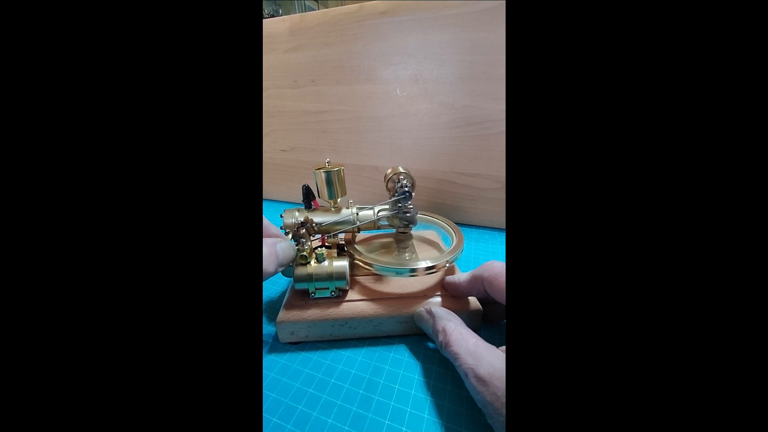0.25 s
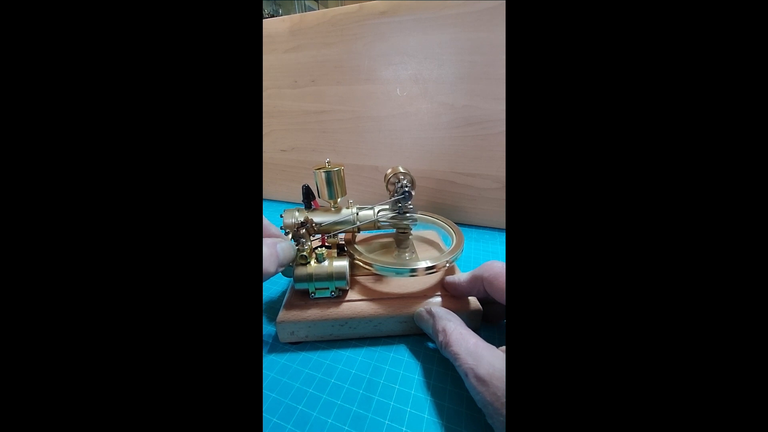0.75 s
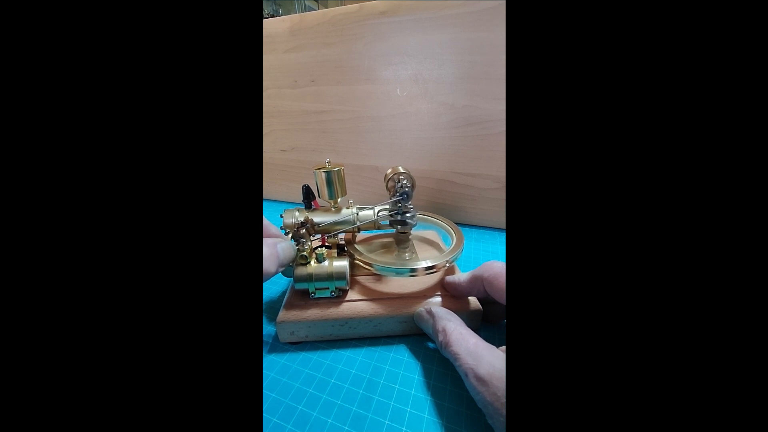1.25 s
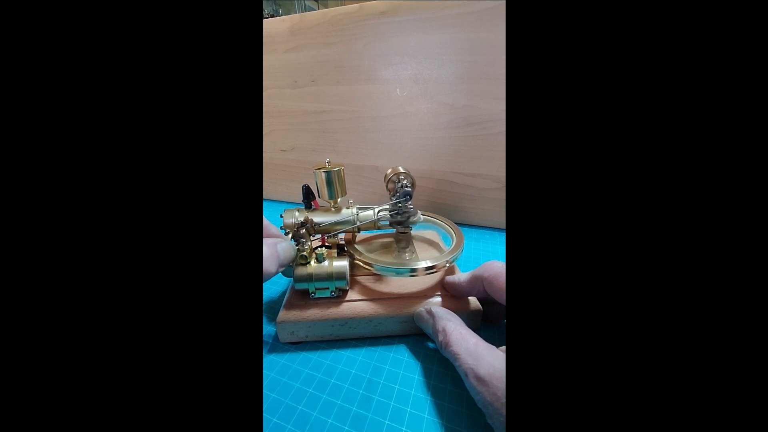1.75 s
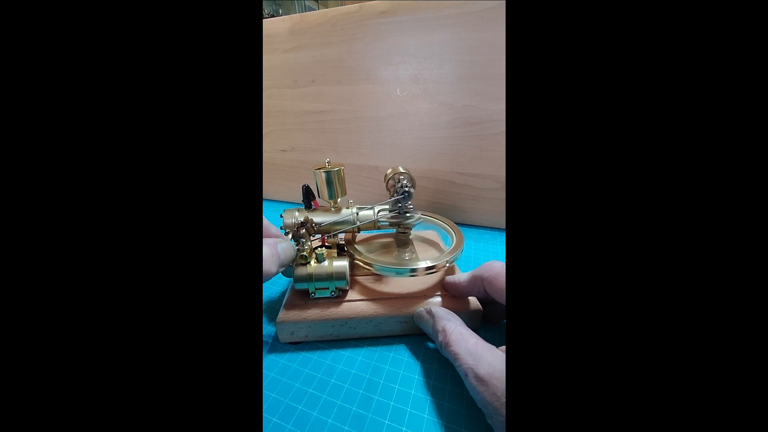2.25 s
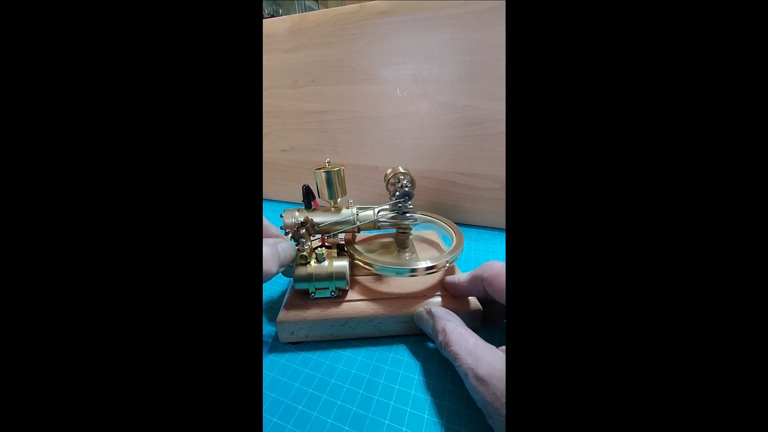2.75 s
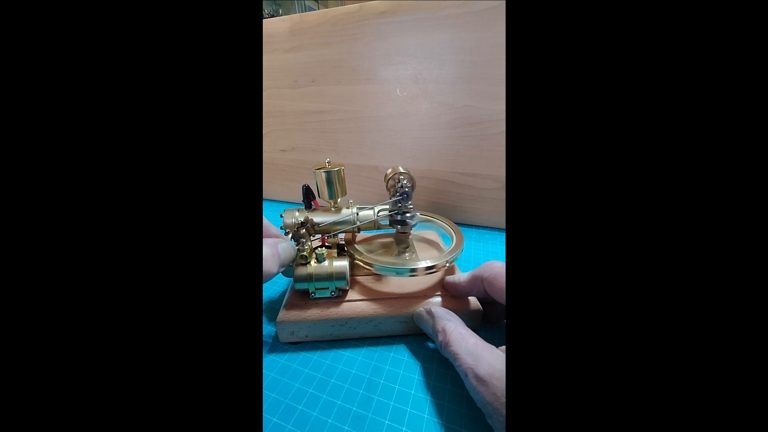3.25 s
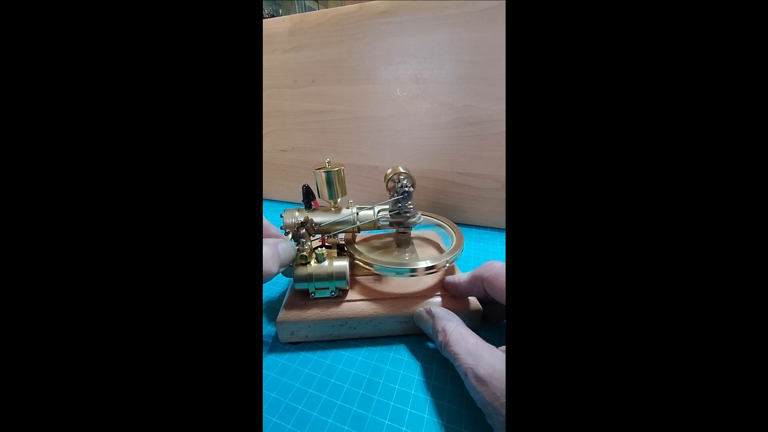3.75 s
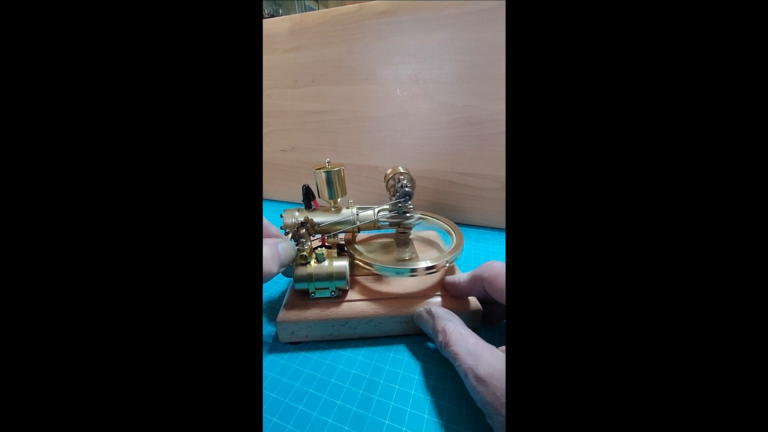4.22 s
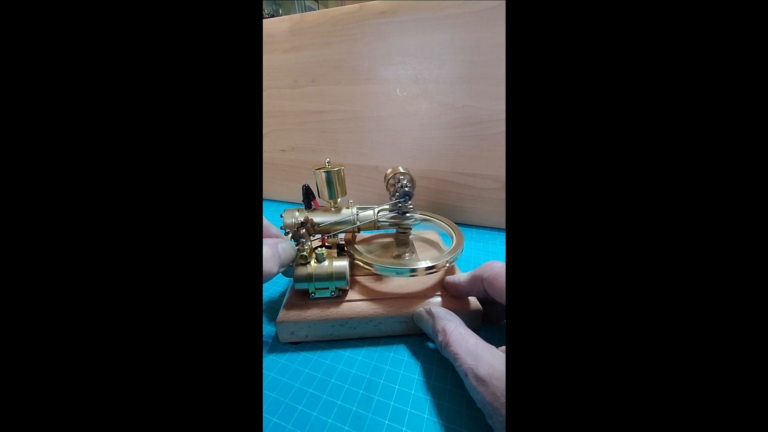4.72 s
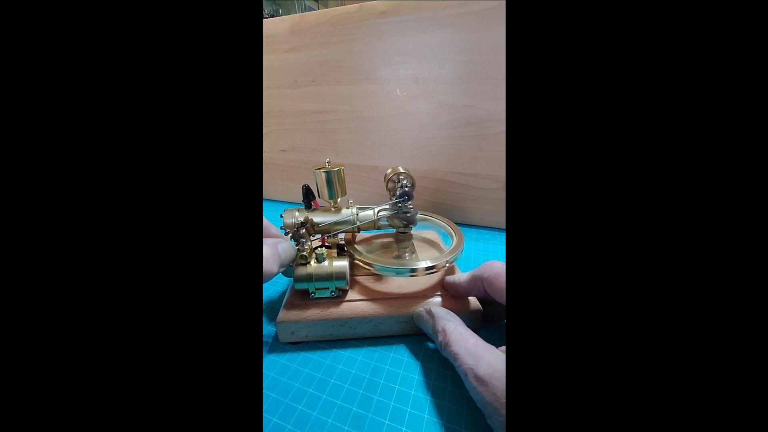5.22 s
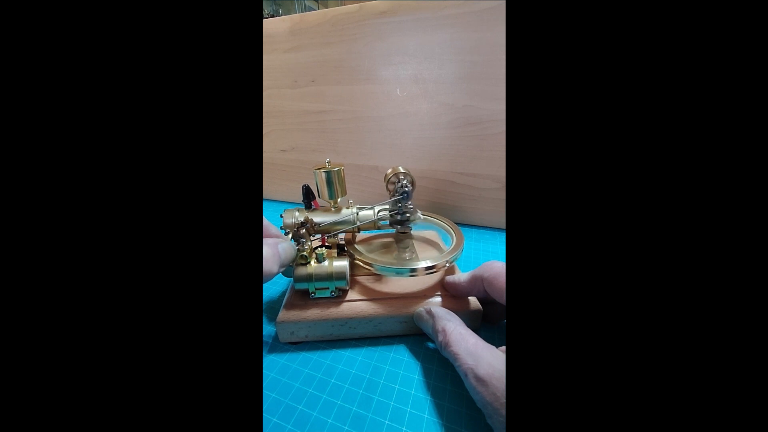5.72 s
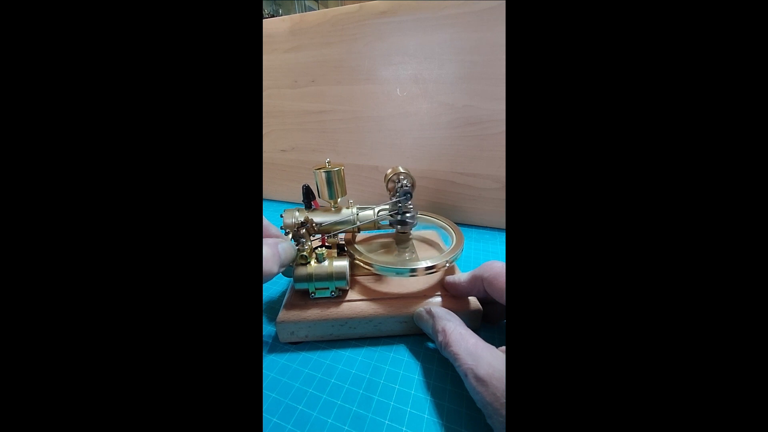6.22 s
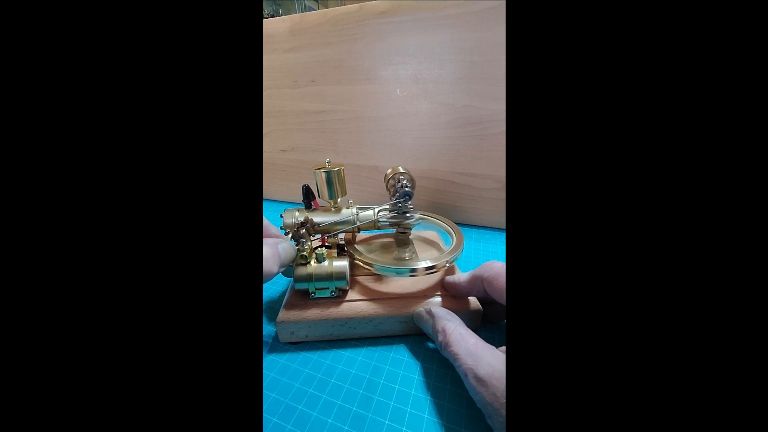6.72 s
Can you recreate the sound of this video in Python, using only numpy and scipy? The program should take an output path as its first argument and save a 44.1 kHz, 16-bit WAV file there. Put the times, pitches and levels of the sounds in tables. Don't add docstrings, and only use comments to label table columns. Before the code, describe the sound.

A small brass hit-and-miss engine pops sharply about three or four times a second, with clacking linkage and short air hisses between, heard close up.

```python
import sys
import numpy as np
from scipy import signal
from scipy.fft import rfft, irfft, next_fast_len
from scipy.io import wavfile
from scipy.ndimage import uniform_filter1d

SR = 44100
rng = np.random.default_rng(int(sys.argv[2]) if len(sys.argv) > 2 else 0)


def unload_wav(signal):
    wavfile.write(
        sys.argv[1],
        SR,
        np.round(np.clip(np.atleast_2d(signal).T, -1, 1) * 32767).astype(np.int16),
    )


def rack_gain(trim_db):
    fader = np.asarray(trim_db, float)
    return 10 ** (fader / 20)


N = 307377

# valve opening in seconds, pop in dB, ring of the top pipe mode in dB,
# flywheel ring in dB, cam clack in dB.
FIRINGS = [(0.0428, -3.5, 1, -54.5, -29.5), (0.3435, -2, 1, -36.5, -27.5), (0.6474, -0.7, -1, -31.5, -28),
           (0.9544, 1.2, -4.5, -44.5, -26.5), (1.2713, -0.9, 0, -46, -29), (1.4811, 1.5, -6.5, -39, -32),
           (1.8086, -1.3, 0.5, -38.5, -31), (2.023, 0.1, -3.5, -37, -33), (2.3545, 0, -2.5, -55, -27),
           (2.5721, 0.5, -4.5, -38, -28), (2.795, 0.6, -6, -40, -30), (3.0192, 1.5, -7, -32, -30.5),
           (3.3729, 0.5, -4.5, -43, -35), (3.6081, 1.9, -13.5, -26.5, -34), (4.1306, -3.5, -3, -52, -41),
           (4.3833, 0.3, -5.5, -40, -46), (4.6331, 0.7, -8.5, -42, -37), (5.0118, -3, -5.5, -60, -44),
           (5.2502, -1.7, -0.5, -58, -37), (5.6042, -3, 0, -66, -38), (5.8305, 0.5, -2, -37, -31),
           (6.177, -1, 0.5, -39, -30), (6.6461, -1.4, -0.5, -43, -34.5)]
LAST_S = 7.002


def read(points, hz):
    f, value = np.transpose(points)
    return np.interp(np.log(hz + 1), np.log(f + 1), value)


def evened(x):
    return x / np.sqrt(np.mean(x ** 2) + 1e-20)


def hiss_noise():
    return rng.standard_normal(N)


def coloured(x, spectrum):
    size = next_fast_len(len(x))
    gain = rack_gain(read(spectrum, np.fft.rfftfreq(size, 1 / SR)))
    return evened(irfft(rfft(x, size) * gain, size)[:len(x)])


def resonance(x, hz, width_hz):
    b, a = signal.iirpeak(hz, hz / width_hz, SR)
    return evened(signal.lfilter(b, a, x))


def bump(x, centre, width):
    return np.exp(-.5 * ((x - centre) / width) ** 2)


def ring(modes, size=8192):
    t = np.arange(size) / SR
    return sum(rack_gain(db - 60 * t / t60) * np.sin(2 * np.pi * hz * t) for hz, db, t60 in modes)


def strikes(s, gain, sound):
    train = np.zeros(N + SR)
    np.add.at(train, np.round(np.clip(s, 0, None) * SR).astype(int), gain)
    return signal.oaconvolve(train[:N], sound)[:N]


def knocks(s, gain, modes, contact_s):
    t = np.arange(512) / SR
    push = t * np.exp(-t / contact_s) / (contact_s ** 1.53 * np.sqrt(SR / 4))
    contact = strikes(s, gain, push)
    return signal.oaconvolve(contact * hiss_noise(), ring(modes))[:N]


def cycles():
    cycle_s = .118
    slowing = 2.7
    gulp_early_s = .0016
    s = np.r_[np.transpose(FIRINGS)[0], LAST_S]
    gap_s = np.diff(s)
    count = np.round(gap_s / cycle_s).astype(int)
    row = np.repeat(np.arange(len(gap_s)), count)
    since = np.arange(len(row)) - (np.cumsum(count) - count)[row]
    speed = (count / gap_s + slowing * gap_s / 2)[row]
    coast_s = (speed - np.sqrt(speed ** 2 - 2 * slowing * since)) / slowing
    return s[row] + coast_s - gulp_early_s * (since > 0), row, since


def crank():
    s = cycles()[0]
    edges = np.r_[2 * s[0] - s[1], s, LAST_S]
    turn = np.interp(np.arange(N) / SR, edges, np.arange(len(edges)))
    return edges[:-1], np.diff(edges), turn % 1, turn


def exhaust():
    # mode in Hz, sign, level in dB, t60 in seconds.
    pipe = [(186.7, -1, -3.5, 0.02), (354.7, 1, -14.5, 0.035), (313, -1, -13, 0.023),
            (1350, 1, -11.5, 0.0073), (999, 1, -3, 0.028), (1196, 1, 4, 0.019)]
    # delay in seconds, sign, level in dB, width in seconds.
    blow = [
        (.00033, 1, -1, 0.00018),
        (.0029, 1, -11, 0.00016),
    ]
    gulp = [
        (.0009, -1, -21.5, 0.00017),
        (.00303, 1, -27, 0.000091),
    ]
    # frequency in Hz, density in dB per Hz.
    crack = [(1060, -9), (1800, -9), (2400, -3.5), (3900, -14.5), (5000, -9), (6910, -21), (9410, 5),
             (10500, -2.5), (11600, -2), (13800, -11), (15300, -2), (16200, -17), (16800, -43)]
    lead_s = .001
    s, row, since = cycles()
    length_s = crank()[1][1:]
    t = np.arange(4096) / SR
    fired = 1. * (since == 0)
    blow_db, ring_db = np.array(FIRINGS)[row, 1:3].T
    gulp_db = 1 + 55 * (length_s - .108) - (since - 1)
    pop_db = np.where(fired, blow_db, gulp_db)

    modes = [sign * ring([(hz, db, t60)], size=4096) for hz, sign, db, t60 in pipe]
    low, high = sum(modes[:5]), sum(modes[5:])
    pop = np.zeros(N)
    for share, steps in ((fired, blow), (1 - fired, gulp)):
        bells = 0
        for delay_s, sign, db, width_s in steps:
            area = width_s * SR * np.sqrt(2 * np.pi)
            bells = bells + sign * rack_gain(db) * bump(t[:400], lead_s + delay_s, width_s) / area
        pop += strikes(s - lead_s, share * rack_gain(pop_db), np.convolve(bells, low))
        pop += strikes(s - lead_s, share * rack_gain(pop_db + fired * ring_db), np.convolve(bells, high))

    decay = rack_gain(-7.5 - 60 * t / 0.014) + rack_gain(-38 - 60 * t / 0.26)
    burst = (1 - np.exp(-t / 0.0015)) ** 2 * decay
    strength = rack_gain(0.4 * pop_db) * (fired + rack_gain(-29) * (1 - fired))
    jet = strikes(s - .0008, strength, burst) * coloured(hiss_noise(), crack)
    return pop, jet


def linkage():
    # mode in Hz, level in dB, t60 in seconds.
    cam = [(303, -10, 0.04), (800, -5, 0.015), (2126, 0, 0.018), (2260, -9, 0.012)]
    wheel = [(5500, -8, 0.03), (5566, -0.5, 0.017), (5600, 5, .04)]
    stem = [(12600, 4.5, .005), (7900, -3.5, 0.0063), (14900, -13, .005)]
    seat = [(3170, 1.5, 0.02), (3600, -2.5, 0.016), (2450, -2, 0.0071), (4770, -19, 0.014)]
    rocker = [(9700, -1.5, 0.008), (9380, -9, 0.0059), (11400, -19, 0.011), (14100, -31, 0.0034),
              (4370, -38, 0.012), (7500, -19.5, 0.064)]
    pushrod = [(7237, -0.5, 0.05), (7360, -5.5, 0.016), (3885, -5.5, 0.033), (5460, -9, 0.046),
               (9300, -4, .01)]
    # part, share of the cycle, share earlier after a firing, level in dB.
    ticks = [
        ("stem", 0, 0.012, -37),
        ("seat", 0.0255, 0, -36.5),
        ("rocker", .233, .011, -20),
        ("pushrod", 0.19, 0.0452, -42.5),
        ("pushrod", 0.47, 0.006, -43),
        ("pushrod", .478, 0.0122, -37.5),
        ("rocker", .589, 0.0061, -34),
    ]
    parts = dict(stem=stem, seat=seat, rocker=rocker, pushrod=pushrod)
    cam_scatter_db, rattle_t60_s, rattle_db = 1.5, .22, 1.5
    seat_slack_s, seat_soft_db = .112, -9.5
    starts_s, lengths_s = crank()[:2]
    s, length_s = starts_s[1:], lengths_s[1:]
    _, row, since = cycles()
    fired = 1. * (since == 0)
    wheel_db, clack_db = np.array(FIRINGS)[row, 3:5].T

    cam_db = clack_db + (1 - fired) * cam_scatter_db * rng.uniform(-1, 1, len(s))
    out = knocks(s + (.225 - 0.0197 * fired) * length_s, rack_gain(cam_db + 0.5), cam, contact_s=0.0014)

    fade = rack_gain(-60 * np.arange(8192) / SR / rattle_t60_s)
    chatter = strikes(s, rack_gain(wheel_db + rattle_db) * fired, fade / np.linalg.norm(fade))
    out += signal.oaconvolve(chatter * hiss_noise(), ring(wheel))[:N]

    slack = dict(seat=rack_gain(seat_soft_db * (length_s < seat_slack_s)))
    for part, share, early, db in ticks:
        late, force = rng.uniform(-0.9, 1, (2, len(s)))
        at_s = s + (share - early * fired + 0.0046 * late) * length_s
        out += knocks(at_s, rack_gain(db) * slack.get(part, 1) * 1.37 ** force, parts[part], contact_s=0.0004)
    return out


def valve_hiss():
    # frequency in Hz, density in dB per Hz.
    air = [(290, -27), (500, -14), (701, -20), (1170, -8), (1750, -18.5), (3240, -13.5), (4810, -18.5),
           (5490, -13.5), (6460, -14.5), (7940, -5), (10500, -11.5), (11300, -1.5), (12900, -7.5),
           (15600, -4), (16800, -75)]
    # share of the cycle, air flow in dB.
    flow = [(0, -54), (.1, -14.5), (.24, -24), (.31, -2), (.38, 2.5), (.44, 0), (.56, -30), (.85, -51),
            (1, -38)]
    # frequency in Hz, width in Hz, level in dB.
    port = [(11200, 400, -8), (15400, 170, -22.5), (9840, 160, -8.5), (3240, 100, -18)]
    s, _, share, turn = crank()
    air_db, scatter_db = -26, 1
    cycle_db = air_db + scatter_db * rng.standard_normal(len(s))
    push_db = np.interp(turn, np.arange(len(s)) + 0.11, cycle_db)
    grit = rack_gain(3. * evened(uniform_filter1d(hiss_noise(), size=30)))
    hiss = coloured(hiss_noise() * grit, air)
    flutter = rack_gain(2.56 * evened(uniform_filter1d(rng.standard_normal((len(port), N)), size=150)))
    for (hz, width_hz, db), waver in zip(port, flutter):
        hiss = hiss + rack_gain(db) * waver * resonance(hiss_noise(), hz, width_hz)
    return hiss * rack_gain(-4.5 + push_db + np.interp(share, *np.transpose(flow)))


def valve_whistles():
    # frequency in Hz, width in Hz, level in dB.
    whistles = [(3325, 29, -7), (4790, 230, -2), (9240, 53, 6), (11600, 300, -25), (15100, 240, -7)]
    # share of the cycle, leak in dB.
    leak = [(0, -40), (.08, -23), (.12, -5.5), (.19, -10.5), (.23, -10.5), (1, -46)]
    s, _, share, turn = crank()
    mood = 2.1 ** rng.uniform(-2.4, 1, len(s) + 1)[turn.astype(int)]
    noise = hiss_noise()
    whistle = sum(rack_gain(db) * resonance(noise, hz, width_hz) for hz, width_hz, db in whistles)
    whistle *= mood * rack_gain(-42.5 + np.interp(share, *np.transpose(leak)))
    hum = rack_gain(-60.5) * resonance(noise, 7240, 130)

    squeak_hz = np.clip(15000 - 45000 * (share - .88), 8000, 16000)
    wobble = evened(uniform_filter1d(hiss_noise(), size=40))
    squeak = np.sin(2 * np.pi * np.cumsum(squeak_hz) / SR) * wobble
    squeak *= mood * rack_gain(-51) * bump(share, .9, 0.031)

    chirp_hz = np.clip(3010 + 8020 * (share - .38), 1000, 6000)
    breath = evened(uniform_filter1d(hiss_noise(), size=120))
    chirp = np.sin(2 * np.pi * np.cumsum(chirp_hz) / SR) * breath
    chirp *= rack_gain(-49.5) * bump(share, .38, 0.08)
    return whistle + hum + squeak + chirp


def base_rumble():
    # frequency in Hz, density in dB per Hz.
    rumble = [(60, -23), (120, -4), (200, -2), (540, -12), (700, -1), (1000, 3), (1250, -16), (1500, -18),
              (3000, -22)]
    level_db, fade_db = -42.5, -8.5
    return rack_gain(level_db + fade_db * crank()[2]) * coloured(hiss_noise(), rumble)


def room(x):
    # frequency in Hz, t60 in seconds.
    decay = [(100, 0.17), (260, 0.5), (700, 0.23), (1200, 0.26), (1600, 0.32), (2100, 0.21), (8000, 0.12)]
    # frequency in Hz,
    # level in dB, t60 in seconds.
    lingering = [(222.3, -43.5, 0.63), (334.7, -54, 0.69), (443.4, -26.5, 0.35), (1143, -27.5, 0.38),
                 (1215, -28.5, 0.2)]
    start, spacing = 480, 20
    taps = np.zeros(SR // 2)
    at = np.arange(start, len(taps) - spacing, spacing)
    taps[at + rng.integers(0, spacing, len(at))] = rng.choice([-1., 1.], len(at))
    hz, t, z = signal.stft(taps, SR, nperseg=512)
    fade = rack_gain(-60 * t / read(decay, hz)[:, None])
    tail = signal.istft(z * fade, SR, nperseg=512)[1][:len(taps)]
    tail *= rack_gain(-15) / np.linalg.norm(tail)
    tail[round(.0115 * SR)] += rack_gain(-27)
    tail[round(.0135 * SR)] += rack_gain(-48)
    tail[start:start + 16384] += rack_gain(-33.5) * ring(lingering, size=16384)
    return signal.oaconvolve(x, tail)[:N]


def hush():
    # frequency in Hz, density in dB per Hz.
    floor = [(24, -55), (40, -36), (202, 9.5), (540, -5), (696, 18.5), (1040, 4), (1180, 1), (1380, -2),
             (1820, -3.5), (6590, -7), (9630, -76), (15600, -32.5), (16800, -52)]
    return rack_gain(-49.5) * coloured(hiss_noise(), floor)


def scene():
    pop, jet = exhaust()
    fine = jet + linkage() + valve_hiss() + valve_whistles()
    echo = room(pop + rack_gain(-0.5) * fine)
    return (pop + fine + echo + base_rumble() + hush())[None]


def roll_off(x):
    return signal.sosfilt(signal.butter(12, 17150, fs=SR, output="sos"), x)


def record(dry):
    cut = signal.sosfilt(signal.butter(3, 75, "high", fs=SR, output="sos"), dry)
    window = ("kaiser", 8)
    edge = signal.firwin(255, 15900, window=window, fs=SR)
    edge += rack_gain(-22) * signal.firwin(255, [15900, 16900], window=window, fs=SR, pass_zero=False)
    limited = signal.oaconvolve(cut, edge[None], "same")
    return roll_off(np.clip(rack_gain(-0.41) * limited, -1, 1))


dry = scene()
out = record(dry)
unload_wav(out)
```